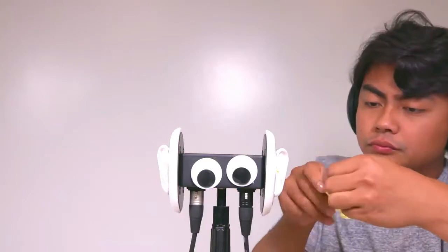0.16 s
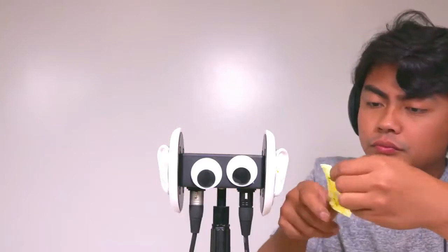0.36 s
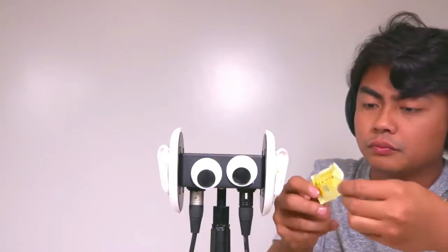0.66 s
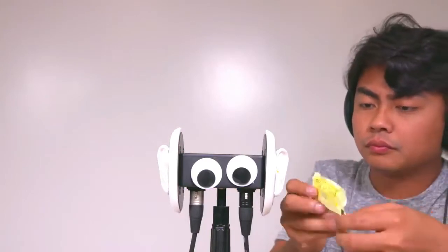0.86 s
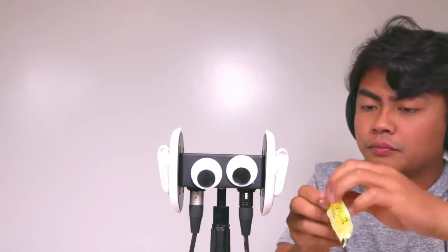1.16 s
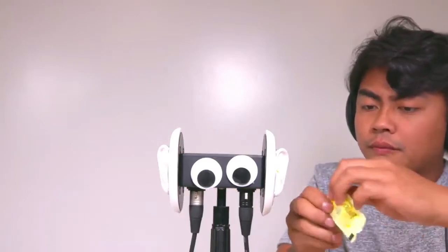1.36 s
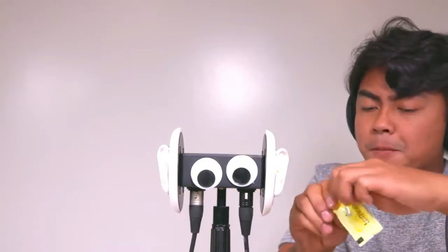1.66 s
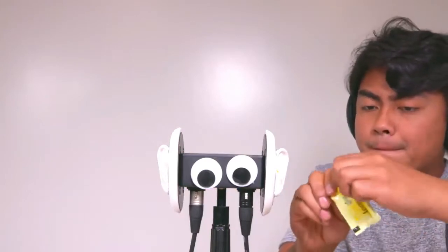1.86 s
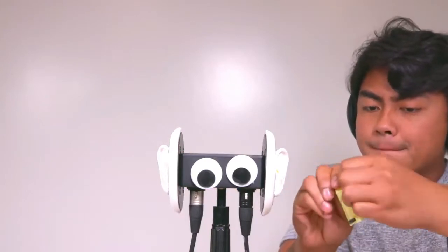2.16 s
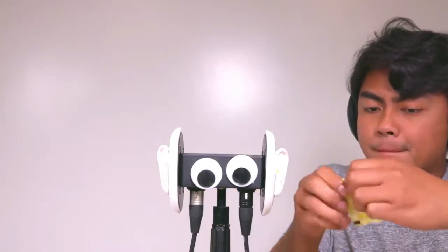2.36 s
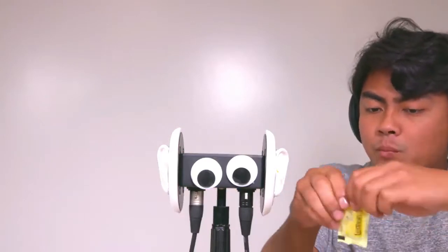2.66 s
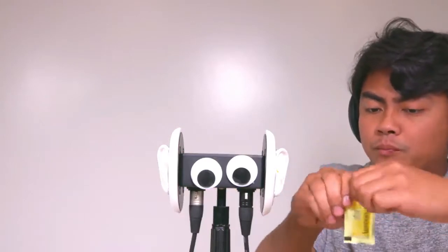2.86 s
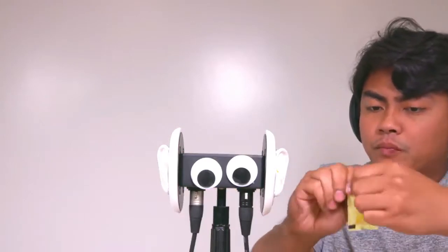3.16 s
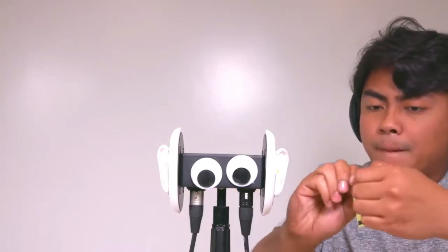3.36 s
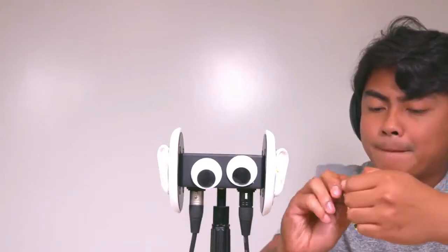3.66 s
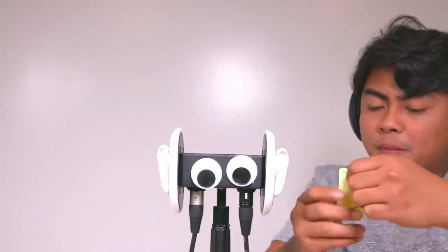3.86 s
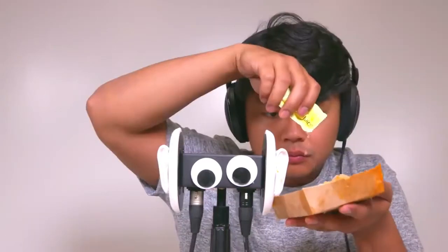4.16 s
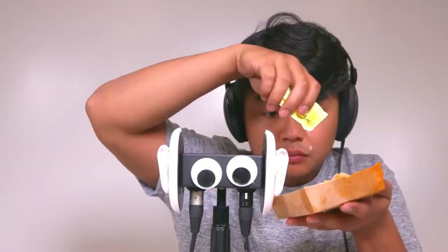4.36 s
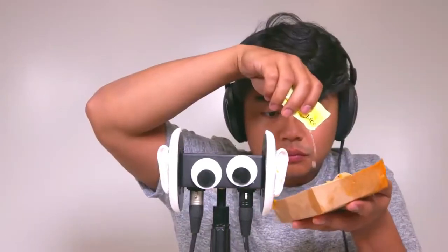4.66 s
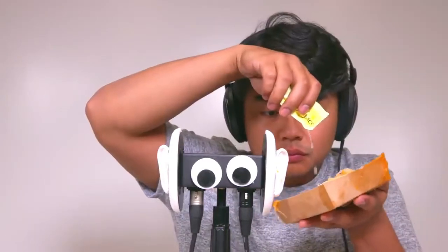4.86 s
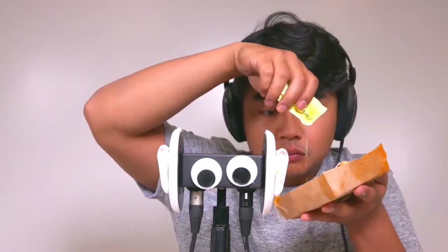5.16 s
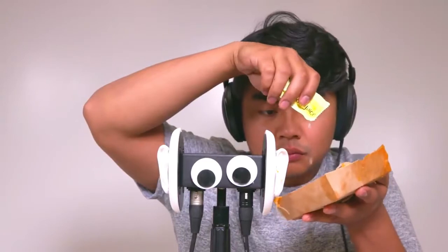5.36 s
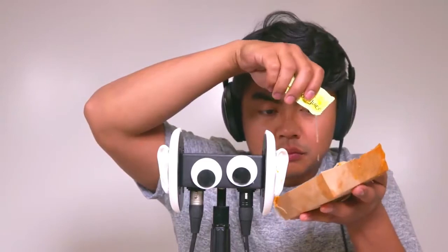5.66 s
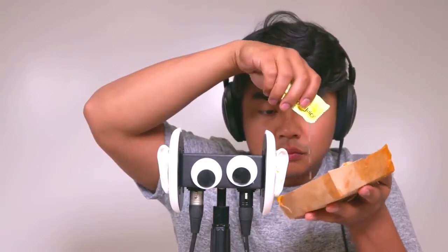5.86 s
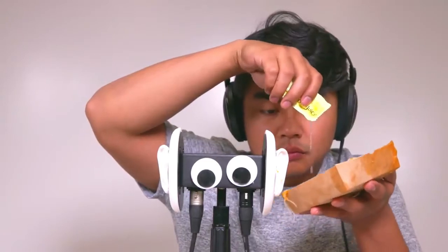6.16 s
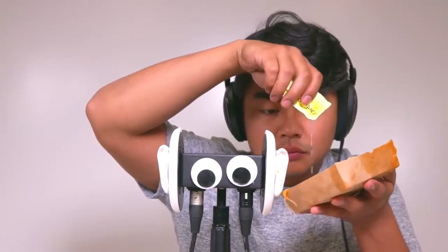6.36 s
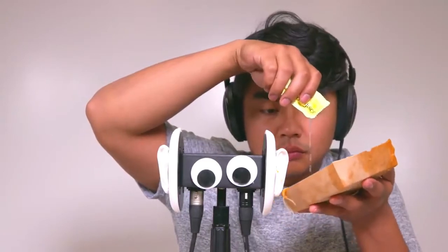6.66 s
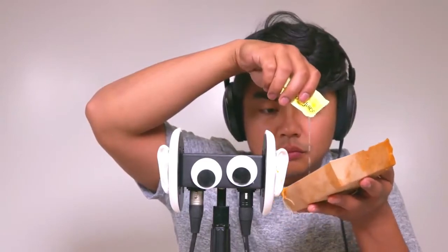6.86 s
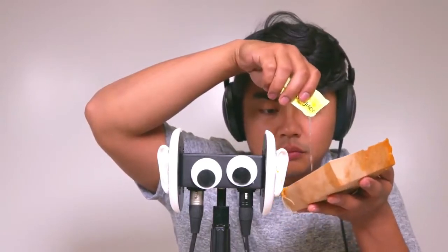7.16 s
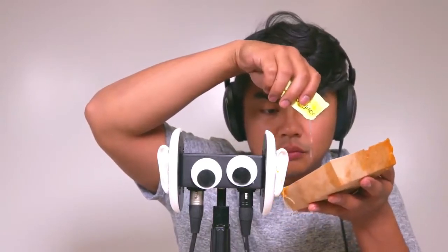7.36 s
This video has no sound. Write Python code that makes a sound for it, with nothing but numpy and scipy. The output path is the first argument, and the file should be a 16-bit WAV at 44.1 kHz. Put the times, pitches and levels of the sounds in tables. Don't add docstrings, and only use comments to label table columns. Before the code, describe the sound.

A small foil packet is torn, turned and pinched with sharp crackling snaps close to the left ear, then squeezed with faint wet ticks and creaks.

```python
import sys
import numpy as np
from scipy import signal
from scipy.fft import rfft, irfft, next_fast_len
from scipy.io import wavfile
from scipy.ndimage import uniform_filter1d

SR = 44100
rng = np.random.default_rng(int(sys.argv[2]) if len(sys.argv) > 2 else 0)


def boost(x):
    u = np.asarray(x, float) / 20
    return 10 ** u


def pcm_store(signal):
    levels = np.round(np.clip(np.atleast_2d(signal), -1, 1) * 32767)
    wavfile.write(sys.argv[1], SR, levels.astype(np.int16).T)


N = 331632

# (frequency [Hz], density [dB per Hz])
FLOOR_SPECTRUM = [(2.9, -18.5), (5.0, 5), (25, -8), (50, -16.5), (98, -22.5), (142, -32.5), (198, -33),
                  (477, -38), (1110, -43.5), (1310, -43), (16000, -63)]
FLOOR_DB = -40
# (frequency [Hz], share [0-1])
FLOOR_LIKENESS = [(30, .75), (100, .62), (300, .45), (700, .05)]
# (time [s], peak [dB], frequency [Hz])
BUMPS = [
    (0.5693, -36, 130),
    (3.2387, -15, 76.5),
    (5.137, -31, 150),
    (5.8057, -32, 140),
    (0.346, -30, 110),
    (0.985, -36, 140),
    (5.165, -34, 200),
]

# (centre [Hz], decay time T60 [s], level [dB])
ROOM_BANDS = [(318, 1, -34), (1030, 0.75, -35), (2500, 0.61, -32), (5000, 0.56, -28.5),
              (10160, 0.41, -19.5)]
# (delay [ms], left level [dB], right level [dB])
ECHOES = [
    (5.2, -31, -23),
    (7.5, -31, -23),
    (11.6, -27, -25),
]
# (frequency [Hz], gain [dB])
TAIL_COLOUR = [(2500, 0), (4600, 1.5), (6800, 0.5), (8100, -3.5), (9500, -1.5), (13000, -6)]
# (frequency [Hz], gain [dB])
NEAR_EAR = [(1300, -0.5), (2200, 0.5), (6600, -1), (8100, 0), (9600, -1), (11500, -1)]
# (frequency [Hz], gain [dB])
HEAD_SHADOW = [(100, -22), (500, -23.5), (1500, -23.5), (3500, -24), (8000, -39.5), ]
EAR_LAG = 29
SCENE_CHANGE_S = 3.952
WALL_DAMPING = 1.5
WALLS_DB_PER_OCTAVE, EDGE_TO_WALLS_DB = 2, -5.5

# (time [s], peak [dB])
KNOCKS = [(6.282, -42), (6.319, -45), (6.339, -40), (6.373, -44), (6.4, -42), (6.433, -53), (6.433, -42),
          (6.483, -51), (6.537, -45), (6.563, -43), (6.582, -46), (6.653, -43.5), (6.681, -46),
          (6.707, -46), (6.731, -46), (6.743, -47), (6.763, -45), (6.796, -57), (6.796, -45), (6.84, -44.5),
          (6.855, -47), (6.878, -46), (6.898, -50), (6.927, -52), (6.945, -44.5), (6.99, -61), (7.028, -43),
          (7.048, -43), (7.069, -44.5), (7.102, -45.5), (7.152, -65.5), (7.152, -58), (7.174, -44),
          (7.198, -40.5), (7.228, -42.5), (7.248, -55), (7.269, -46), (7.295, -45), (7.317, -41.5),
          (7.339, -47), (7.349, -46), (7.364, -42.5), (7.396, -43), (7.417, -39.5), (7.441, -45),
          (7.459, -47), (7.484, -61)]
# (frequency [Hz], decay [cycles], level [dB])
KNOCK_MODES = [(553, 0.59, 10), (1300, 3, -1)]
KNOCK_LAG_S = 0.0025

# (start [s], end [s], level [dB], brightness [dB])
RUBS = [(0.001, 0.1, -59.5, -9.5), (0.173, 0.202, -36, 8.5), (0.195, 0.234, -24.5, 4),
        (0.237, 0.257, -23.5, 1), (0.249, 0.308, -38.5, 9), (0.31, 0.336, -20, 4.5),
        (0.33, 0.395, -25, -2.5), (0.386, 0.417, -26, 4.5), (0.408, 0.441, -25.5, -3),
        (0.52, 0.875, -46, 3.5), (0.797, 0.824, -31, 5), (0.837, 0.898, -41, 1.5), (0.903, 1.029, -34.5, 0),
        (0.94, 1.038, -37, -9.5), (2.454, 2.491, -32, 14.5), (2.687, 2.8, -38, 0.5),
        (2.706, 2.952, -44.5, -3.5), (3.729, 3.9, -48, -2), (3.876, 3.928, -29.5, 2.5),
        (4.009, 4.078, -45.5, -2.5), (4.108, 4.394, -58, -1.5), (4.172, 4.196, -53.5, 1),
        (4.259, 4.298, -55.5, 3), (3.775, 3.82, -50.5, -3), (4.226, 4.243, -63, -1),
        (4.477, 4.679, -58.5, -16.5), (4.655, 4.745, -39.5, -0.5), (4.781, 4.891, -46, 2),
        (4.865, 4.989, -37, 1.5), (5.031, 5.094, -39.5, 1), (5.122, 5.191, -39.5, -15.5),
        (5.197, 5.226, -51.5, -11.5), (5.797, 5.824, -53.5, -17.5), (5.886, 5.969, -50, 2.5),
        (6.447, 6.536, -49.5, 1), (7.095, 7.128, -47.5, 4.5)]
# (frequency [Hz], density [dB per Hz])
FILM_SPECTRUM = [(120, -8.5), (200, -7.5), (821, -9.5), (1480, -8), (2090, -7.5), (3250, -6.5), (6280, -8),
                 (9930, -11), (16000, -19.5)]
# (frequency [Hz], sharpness [Q], level [dB])
FILM_RINGS = [(1628, 1.6, -6), (3300, 4, -7.5), (4900, 6.6, -3.5)]
RUB_TOP_DB, RUB_LOW_DB = -7.5, -15

# (time [s], peak [dB], ring [Hz])
STRAYS = [(1.141, -30.5, 3000), (2.174, -35, 2000), (6.159, -46, 2297), (6.172, -42.5, 2620),
          (6.19, -42, 2020), (6.243, -47, 4700), (6.284, -27.5, 1800), (1.274, -32, 2200),
          (1.279, -20.5, 9000), (1.735, -28, 11000), (2.655, -31, 1390), (6.2, -39.5, 2370),
          (6.789, -37, 4000), (7.271, -42, 5000), (5.518, -44, 3300), (5.548, -51.5, 2580),
          (5.6, -45, 2490), (5.653, -44.5, 1900), (6.75, -34, 4520), (0.208, -21.5, 3800),
          (0.2125, -12, 3600), (0.309, -9, 3000), (0.318, -14, 2200), (0.349, -5.5, 4200),
          (0.43, -16, 3100), (0.403, -15, 3400), (0.0852, -37.5, 2500), (0.0633, -50, 3500),
          (0.2058, -19, 3800), (0.2101, -18, 2000), (0.2166, -9, 3800), (0.2195, -18, 2000),
          (0.2455, -20, 3500), (0.3275, -14, 3200), (2.464, -22.5, 4000), (2.4695, -12.5, 3000),
          (2.4742, -9.5, 3200), (2.727, -36, 5200), (2.756, -33.5, 4800), (5.348, -43, 3000),
          (5.389, -21.5, 2500), (6.0466, -48, 4000), (6.0596, -46.5, 4000), (6.082, -42, 7000),
          (6.395, -26.5, 11000), (6.861, -33, 9000), (7.17, -32.5, 12000), (7.371, -37, 4500),
          (6.93, -50, 3500), (1.968, -41, 6500), (2.018, -47, 10030), (1.629, -24, 3300),
          (2.4725, -13, 2900)]
# (start [s], end [s], level [dB])
SIZZLE = (7.2, 7.499, -51)
# (time [s], peak [dB], ring [Hz], top edge [dB re peak])
GRIP_TICKS = [(5.2671, -31.5, 4250, -30.5), (5.2851, -41.5, 4650, -1.5), (5.3322, -26.5, 2640, -30),
              (5.3558, -31.5, 2090, -26), (5.3732, -25.5, 2270, -14), (5.3783, -28.5, 3010, -10.5),
              (5.386, -30, 2370, -4), (5.4251, -28.5, 2640, -25), (5.6125, -48.5, 4950, 18.5),
              (5.6301, -30.5, 6420, -5), (5.8118, -39, 2010, -28), (5.8916, -48.5, 4360, 22.5),
              (5.9114, -27, 4800, -10.5), (5.933, -40, 4970, 14), (6.206, -35, 4450, 4.5),
              (6.2336, -35, 2100, -27), (6.254, -21, 2060, -39.5), (6.26, -18, 3440, -7)]
GRIP_BODY_DB = -15.5
# (time [s], peak [dB], top edge [dB
CREAK = [(6.3754, -26, -17), (6.4015, -24, 0), (6.4275, -16.5, -23), (6.4484, -19.5, -16), (6.5, -32, -16),
         (6.54, -24, -27), (6.5845, -17.5, -29), (6.6046, -24.5, -22), (6.6556, -24, -17),
         (6.6836, -21, -3), (6.6886, -16.5, -17.5), (6.71, -27, -4), (6.7325, -27.5, -22.5),
         (6.7635, -31, -25), (6.7936, -23.5, -12), (6.841, -27, -14), (6.856, -25, -6), (6.8801, -22.5, -9),
         (6.8979, -25, -16), (7.0311, -23.5, -13), (7.0504, -29.5, -4), (7.0696, -34, -0.5),
         (7.1047, -30.5, 3.5), (6.4643, -34, 1), (6.6219, -31, -12.5), (6.744, -30.5, -8),
         (6.8106, -28, -12), (6.9065, -36, -15), (6.3425, -27, -20),
         (7.1756, -37, -4), (7.1996, -33.5, -9), (7.2296, -30, -5), (7.249, -39, -19), (7.2775, -36, -6),
          (7.297, -48, -7), (7.3192, -37, -3), (7.3411, -35, -15), (7.3504, -42, 5), (7.3662, -31, -30),
          (7.399, -45, -2), (7.4321, -39, 0), (7.487, -44, -9), (7.5076, -41, -8), (7.1565, -49, 2),
          (7.4179, -30.5, -24), (7.4429, -34, -12), (7.4606, -32, -4), (7.4694, -32.5, -17)]
# (time [s], ring [Hz])
CREAK_HZ = [(6.4, 2980), (6.75, 4700), (7.5, 5000)]
CREAK_BODY_DB = -13.5

# (time [s], peak [dB], ring [Hz], top edge [dB re peak])
TEAR = [(0.1119, -13.5, 3680, -22.5), (0.1335, -20.5, 2700, -31), (0.1556, -30, 4900, 3),
        (0.1859, -19, 4070, 2.5), (0.2046, -9.5, 3560, -10.5), (0.2145, -6, 3960, -1.5),
        (0.2418, -22.5, 3630, -11), (0.2792, -15, 4320, -17), (0.305, 3.5, 5000, 0.5),
        (0.3252, -7, 4300, 0), (0.3461, 10.5, 3850, -15), (0.3542, 4.5, 4200, -3.5),
        (0.3811, -11.5, 4500, -1.5), (0.4205, -12, 3700, -5), (0.5693, -31.5, 3300, -6),
        (0.6207, -21, 3950, -16.5), (0.791, -22.5, 3600, -16), (0.808, -10, 3400, -20.5),
        (0.8145, -3.5, 4040, -17), (0.9329, -17, 3200, -21), (0.944, -22, 5300, 2.5),
        (0.954, 0.5, 4500, -20.5), (0.9856, 3.5, 4100, -13), (1.0438, -28.5, 2900, -22)]
# (time [s], peak [dB], ring [Hz], top edge [dB re peak])
TURN = [(1.2641, -23, 3670, -24.5), (1.281, -16, 3030, -27), (1.292, -16, 3860, -17), (1.327, -23, 3550, 2),
        (1.3332, -12, 3760, -24.5), (1.3407, -8.5, 4670, 2.5), (1.355, -6.5, 3160, -29),
        (1.4049, -15.5, 3820, -6), (1.446, -17, 2150, -21), (1.45, -0.5, 2270, -10.5),
        (1.514, -34.5, 5960, 8.5), (1.5523, -14.5, 2240, -40), (1.6052, 2.5, 3770, -10.5),
        (1.615, -28, 4330, -24), (1.6199, -13, 3660, -29), (1.6463, -20.5, 2600, -21),
        (1.6598, -10.5, 4100, -5), (1.805, -35, 1740, -5.5), (1.8999, -21, 2600, -33.5),
        (2.061, -8.5, 4360, -14.5), (2.1531, -30, 2250, -25), (2.1947, -26, 2220, -15.5),
        (2.249, -7.5, 4460, -9.5), (2.391, -23, 4900, -12), (2.4202, -26.5, 4600, -11),
        (2.2255, -42.5, 6000, 3), (2.2882, -34, 1230, -20)]
# (time [s], peak [dB], ring [Hz], top edge [dB re peak])
PINCH = [(2.4683, 1, 4450, -8), (2.471, -2, 4780, -7), (2.5995, -3.5, 3630, -30.5),
         (2.619, -20.5, 5020, -12), (2.6614, -25.5, 3720, 7.5), (2.7027, -15, 3360, -18.5),
         (2.7869, -10, 2400, -26), (2.8007, -21, 2250, -16.5), (2.963, -3, 4330, -17.5),
         (3.0497, -7.5, 4530, -33), (3.0769, -23, 2670, -16.5), (3.0895, -12, 3830, -14.5),
         (3.143, 2, 5000, -16), (3.2336, -24, 2886, -21), (3.24, -6.5, 4330, -10),
         (3.2681, -16.5, 3780, -13), (3.2789, -17, 3460, -1.5), (3.2992, -10, 3600, -35.5),
         (3.401, -24, 4800, 1.5), (3.432, -8.5, 4150, -21), (3.4555, -4.5, 3980, -15),
         (3.5654, -16.5, 4930, -17.5), (3.8004, -15, 3610, -38.5), (3.861, -28, 5420, 6),
         (3.878, -4, 3950, -4.5), (3.8978, -11, 3930, -15.5), (3.9088, -4, 3070, -33.5)]
# (time [s], peak [dB], ring [Hz], top edge [dB re peak])
SQUEEZE = [(4.028, -29, 4500, -20), (4.0401, -24.5, 4380, -22.5), (4.1758, -34.5, 4320, -8.5),
           (4.288, -46, 5500, 12), (4.3319, -25, 4980, -14), (4.684, -30.5, 2520, -16),
           (4.8071, -28.5, 3500, -6), (5.0306, -34.5, 4610, -6), (5.067, -24.5, 5000, -11),
           (5.1146, -38.5, 6200, 20.5), (5.3978, -16.5, 2860, -22.5), (5.7217, -20.5, 3250, -44),
           (6.2702, 4, 4000, -8), (6.4361, -8.5, 7200, 0), (6.5655, -16.5, 4600, -11),
           (6.5911, -11, 4450, -8.5), (6.798, -15, 5000, -10.5), (6.948, -15, 6000, -8)]
# (low body [dB re peak], thrown toward the walls [dB])
GRIPS = [
    (-17, -3),
    (-22.5, 4.5),
    (-25, 5.5),
    (-17, -1.5),
]
TYPICAL_DB, TYPICAL_HZ = -16, 3800
BODY_PER_DB, BODY_DB_PER_OCTAVE, WALLS_PER_DB = -0.26, -11.5, 0.2162
# (time [s], no bass below [Hz], second ring [Hz], its level [dB re peak], first ring [cycles])
ACCENTS = [(0.112, 200.3, 1860, 3.5, 1.4), (0.214, 304.5, 2400, -11.5, 1.4), (0.3045, 500, 6900, -7, 1.1),
           (0.3456, 400, 6300, -14.5, 1.8), (0.354, 402, 6270, -9.5, 1.2), (0.8145, 200, 1620, -15.5, 1.2),
           (0.954, 300, 1850, -2, 0.9), (0.9856, 306.7, 2500, -24.5, 3.1), (1.34, 493, 6700, -4.5, 0.75),
           (1.4495, 543, 4050, -8.5, 0.87), (1.553, 300, 1450, 0, 1.3), (1.6055, 914, 3250, -42, 1.2),
           (1.899, 199, 1180, 1, 0.59), (2.061, 1300, 2380, -5.5, .9), (2.249, 1500, 4300, -10.5, 1.6),
           (2.4667, 1700, 2400, -9, 1.9), (2.471, 503, 2520, -13.5, 2.6), (2.5997, 1200, 3180, -1, 1.8),
           (2.963, 910, 3210, -18.5, 1.1), (3.1435, 3300, 1710, -0.5, 1.4), (3.24, 300, 2070, -6, 0.73),
           (3.432, 1500, 2250, -18.5, 0.72), (3.455, 400, 4060, -13, 0.91), (3.877, 400, 6600, -6, 1.6),
           (3.9087, 1070, 4300, -23, 1.6), (5.3974, 198, 1110, -4.5, 0.58), (5.722, 1000, 2440, -5, 1.0),
           (6.271, 3280, 6860, -3, 1.2), (6.436, 300, 7800, -7, 1.8), (6.5909, 300, 2340, -10, 2.6),
           (6.9478, 3000, 7700, 14, 1.0), (1.281, 100, 700, -4, 0.66)]
# (no bass below [Hz], second ring [Hz], its level [dB re peak], first ring [cycles])
WET = (53, 2302, -16.5, 0.66)
# (no bass below [Hz], second ring [Hz], its level [dB re peak], first ring [cycles])
PLAIN = (60, 3000, -60, 1.25)


def colour(x, points):
    hz, db = np.transpose(points)
    size = next_fast_len(x.shape[-1] + SR // 8)
    f = np.maximum(np.arange(size // 2 + 1) * SR / size, 1)
    gain = boost(np.interp(np.log(f), np.log(hz), db))
    return irfft(rfft(x, size) * gain, size)[..., :x.shape[-1]]


def unit(x):
    return x / np.sqrt(np.mean(x ** 2))


def peak_one(rows):
    return rows / np.abs(rows).max(axis=1, keepdims=True)


def walk(rate):
    hold = int(SR / rate)
    levels = np.repeat(rng.standard_normal(N // hold + 1), hold)
    return uniform_filter1d(levels, hold)[:N]


def ring(kicks, hz, cycles):
    t = np.arange(kicks.shape[1]) / SR
    hz, cycles = np.reshape(hz, (-1, 1)), np.reshape(cycles, (-1, 1))
    mode = np.sin(2 * np.pi * hz * t) * np.exp(-t * hz / cycles)
    return peak_one(signal.fftconvolve(kicks, mode, axes=1)[:, :len(t)])


def place(each, s):
    size = each.shape[1]
    out = np.zeros(N + size)
    np.add.at(out, (s * SR).astype(int)[:, None] + np.arange(size), each)
    return out[:N]


def floor():
    hz, share = np.transpose(FLOOR_LIKENESS)
    share = np.clip(share, 0.001, 0.999)
    same = colour(rng.standard_normal(N), list(zip(hz, 10 * np.log10(share))))
    own = colour(rng.standard_normal((2, N)), list(zip(hz, 10 * np.log10(1 - share))))
    air = unit(colour(same + own, FLOOR_SPECTRUM)) * boost(FLOOR_DB + 0.83 * walk(26.0))
    left = colour(air[0], [(60, 0.92), (900, 0.77), (2400, 0.1)])
    right = colour(air[1], [(60, -1.05), (900, -3.5), (2400, -1.5)])
    return np.array([left, right])


def bumps():
    t, out = np.arange(N) / SR, 0
    for s, db, hz in BUMPS:
        cycle = np.maximum(t - s, 0) * hz
        out = out - boost(db) * np.sin(2 * np.pi * cycle) * np.exp(-cycle / 0.46)
    return out * boost([[0.1], [-7]])


def room():
    t = np.arange(SR // 2) / SR
    tail = 0
    for hz, t60, db in ROOM_BANDS:
        band_shape = [(hz / 3, -30), (hz / 1.4, 0), (hz * 1.4, 0), (hz * 3, -30)]
        band = unit(colour(rng.standard_normal((2, len(t))), band_shape))
        tail = tail + boost(db - 33.0) * band * boost(-60 * t / t60)
    onset = np.clip((t - 0.003) / 0.0033, 0, 1)
    tail = tail * onset * boost([[0.5], [-0.6]])
    echoes = np.zeros_like(tail)
    for ms, left_db, right_db in ECHOES:
        echoes[:, int(ms * SR / 1000)] = boost(np.array([left_db, right_db]))
    return colour(tail, TAIL_COLOUR) + colour(echoes, [(300, -8.5), (3000, -6.5), (14000, -10.0)])


def knocks(size=768):
    s, db = np.transpose(KNOCKS)
    kicks = np.zeros((len(s), size))
    kicks[:, 0] = 1
    detune = 2 ** (0.12 * np.tanh(rng.standard_normal((len(s), 2)).T))
    each = 0
    for (hz, cycles, level_db), shift in zip(KNOCK_MODES, detune):
        each = each + boost(level_db) * ring(kicks, hz * shift, cycles)
    return place(boost(db)[:, None] * each, s + KNOCK_LAG_S)


def rubs():
    t = np.arange(N) / SR
    sizes = boost(3.0 * np.minimum(rng.exponential(size=N), 2.5))
    slips = rng.standard_normal(N) * sizes * (rng.random(N) < 0.35)
    flurry = walk(200)
    film = colour(slips * boost(2.8 * flurry), FILM_SPECTRUM)
    low = colour(film, [(800, 0), (1300, -30)])
    top = colour(film, [(3500, -30), (6000, 0)])
    mid, low, top = unit(film - low - top), unit(low), unit(top)
    for k, (hz, sharp, db) in enumerate(FILM_RINGS):
        patch = signal.lfilter(*signal.iirpeak(hz, sharp, SR), film)
        drift = np.roll(flurry, (k + 1) * SR)
        mid = mid + unit(patch * boost(4.0 * drift)) * boost(db)
    mid = unit(mid)
    skin = unit(colour(mid, [(3200, -2), (4400, -11.0)]))
    out = np.zeros(N)
    for start, end, db, bright_db in RUBS:
        u = slice(int(start * SR), int(end * SR))
        swell = np.sin(np.pi * np.clip((t[u] - start) / (end - start), 0, 1)) ** 1.2
        stroke = (skin if bright_db < -10 else mid)[u]
        stroke = stroke + boost(RUB_TOP_DB + bright_db) * top[u] + boost(RUB_LOW_DB - bright_db) * low[u]
        out[u] += swell * boost(db) * stroke
    return out


def snaps(table, gain_db, body_hz, slips, damping=1, accent=PLAIN, size=384):
    s, db, hz, low_db, top_db = np.transpose(table)
    chance = rng.standard_normal((len(s), size + 4))
    t = np.arange(size) / SR
    kicks = chance[:, :size] ** 3 * slips * np.exp(-t / 0.001)
    kicks[:, 0] = np.sign(chance[:, 0])
    spread = np.tanh(chance[:, size:].T)
    cut_hz, second_hz, second_db, cycles = (np.reshape(c, (-1, 1)) for c in accent)

    patch = ring(kicks, hz, np.maximum(cycles, 0.3) / damping)
    patch = patch + boost(second_db) * ring(kicks, second_hz, 0.97 / np.sqrt(damping))
    patch = patch + 0.052 * ring(kicks, 0.76 * hz * 2 ** (0.25 * spread[0]), 0.8)
    patch = patch + 0.25 * ring(kicks, 5000, 0.9)
    patch = signal.sosfilt(signal.butter(2, [1100, 8800], "band", fs=SR, output="sos"), patch)
    patch = signal.sosfilt(signal.butter(2, 9000, fs=SR, output="sos"), patch)
    body = ring(kicks, body_hz * 2 ** (0.35 * spread[1]), cycles=0.6)
    edge = -ring(kicks, 9500 * 2 ** (0.06 * spread[2]), 1.4)
    edge = edge + 0.11 * ring(kicks, 13000 * 2 ** (0.1 * spread[3]), 1.3)

    each = peak_one(patch) + boost(low_db)[:, None] * body + boost(top_db)[:, None] * peak_one(edge)
    each = boost(db + gain_db)[:, None] * each
    jf = 1j * np.arange(size + 1) * SR / (2 * size)
    corner = cut_hz / 1.3
    bass_cut = (jf ** 2 / (jf ** 2 + 1.4 * jf * corner + corner ** 2)) ** 2
    each = irfft(rfft(each, 2 * size) * bass_cut)[:, :size]
    return place(each, s)


def strays():
    rows = np.pad(STRAYS, ((0, 0), (0, 2)), constant_values=-20)
    return snaps(rows, 0, body_hz=700, slips=0)


def sizzle(count=50):
    u = rng.random((count, 4)).T
    start, end, db = SIZZLE
    s = start + (end - start) * u[0]
    rows = [s, db - 12 * u[1], 3900 * 2 ** (0.66 * u[2]), -14 - 9 * u[3], -9 * u[1]]
    return snaps(np.transpose(rows), 0, body_hz=800, slips=0)


def wet_ticks():
    s, db, hz, top_db = np.transpose(GRIP_TICKS)
    body_db = GRIP_BODY_DB + BODY_DB_PER_OCTAVE * np.log2(hz / TYPICAL_HZ)
    grip = [s, db, hz, body_db, top_db]
    s, db, top_db = np.array(CREAK).T
    creak_hz = np.interp(s, *np.transpose(CREAK_HZ))
    creak = [s, db, creak_hz, CREAK_BODY_DB + 0 * db, top_db]
    return snaps(np.hstack([grip, creak]).T, 0, body_hz=553, slips=0.057, accent=WET)


def accents(s):
    out = np.tile(np.array(PLAIN, float), (len(s), 1))
    for at, *character in ACCENTS:
        out[np.argmin(abs(s - at))] = character
    return out.T


def creases():
    actions = TEAR, TURN, PINCH, SQUEEZE
    s, db, hz, top_db = np.concatenate(actions).T
    body_db, walls_db = np.repeat(GRIPS, [len(a) for a in actions], axis=0).T
    bigger_db, octaves = db - TYPICAL_DB, np.log2(hz / TYPICAL_HZ)
    body_db = body_db + BODY_PER_DB * bigger_db + BODY_DB_PER_OCTAVE * octaves
    walls_db = walls_db + WALLS_PER_DB * bigger_db + WALLS_DB_PER_OCTAVE * octaves
    return np.transpose([s, db, hz, body_db, top_db]), walls_db


def reverberate(outward):
    t, response = np.arange(N) / SR, room()
    before, after = (signal.fftconvolve((outward * part)[None], response, axes=1)[:, :N]
                     for part in (t < SCENE_CHANGE_S, t >= SCENE_CHANGE_S))
    return before * np.clip((SCENE_CHANGE_S - t) / 0.014 + 0.5, 0, 1) + after


def scene():
    rows, to_walls_db = creases()
    character = accents(rows[:, 0])
    strokes, ticks = rubs(), wet_ticks() + sizzle()
    near = snaps(rows, 0, body_hz=700, slips=0.07, accent=character)
    near = near + strokes + ticks + knocks() + strays()
    outward = snaps(rows + [0, 0, 0, 0, EDGE_TO_WALLS_DB], to_walls_db + 2.5, body_hz=598.6, slips=0,
                    damping=WALL_DAMPING, accent=character)
    outward = outward + boost(3.5) * strokes + boost(-25.0) * ticks
    near = colour(near, NEAR_EAR)
    far = np.roll(colour(near, HEAD_SHADOW), EAR_LAG)
    return np.array([near, far]) + reverberate(outward) + floor() + bumps()


def top_cut(x):
    return signal.sosfilt(signal.butter(12, 16000, fs=SR, output="sos"), x)


def record(dry):
    heard = colour(dry, [(10500, -1.0), (15800, -0.5), (16800, -39)])
    return top_cut(np.clip(heard, -1, 1))


dry = scene()
out = record(dry)
pcm_store(out)
```